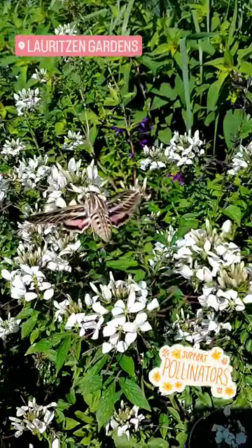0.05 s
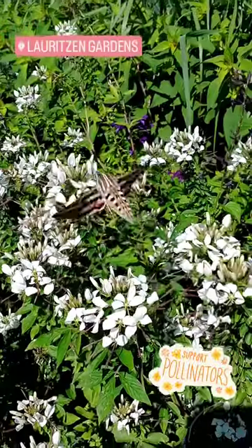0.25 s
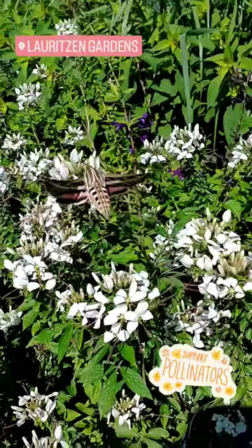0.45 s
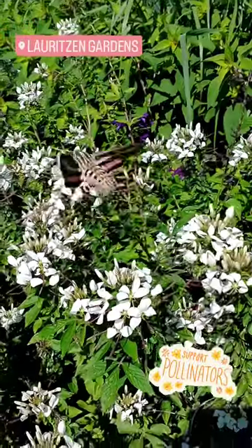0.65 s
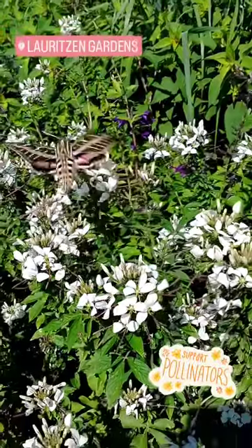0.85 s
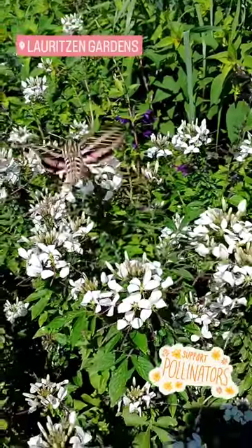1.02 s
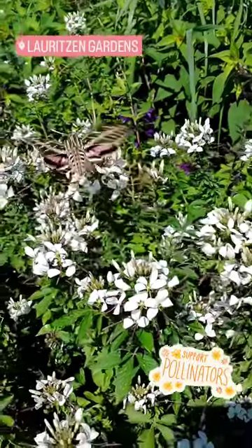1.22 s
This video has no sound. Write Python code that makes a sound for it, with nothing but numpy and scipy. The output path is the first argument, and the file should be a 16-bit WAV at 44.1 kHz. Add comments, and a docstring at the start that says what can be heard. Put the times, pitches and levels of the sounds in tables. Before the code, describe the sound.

Soft, gusty wind on the microphone, with faint insects trilling and chirping in a garden.

```python
"""After a moment of silence, a breeze rumbles and rushes at the microphone in a sunny flower garden.
It dies down together with the hum of a far machine. In the plants, over a distant insect chorus, one
insect rasps steadily, a second buzzes in two bouts, a third scrapes a fast, high trill with its wings
and two more give short chirps. Close by, something small squeaks once."""
import sys
import numpy as np
from scipy import signal
from scipy.fft import rfft, irfft
from scipy.io import wavfile

SR = 44100
rng = np.random.default_rng(int(sys.argv[2]) if len(sys.argv) > 2 else 0)


def dump_mix(stems):
    """Bounce the given channels to the path in sys.argv[1] as a 16-bit WAV at rate SR."""
    frames = np.atleast_2d(stems).T  # one column per channel
    limited = np.clip(frames, -1, 1)  # hard clip at full scale
    pcm = np.round(limited * 32767).astype(np.int16)
    wavfile.write(sys.argv[1], SR, pcm)


N = 112454


def undb(db):
    return 10 ** (np.asarray(db) / 20)


def clock():
    """Time of each sample in s."""
    return np.arange(N) / SR


def curve(rows, column=1):
    """One column of a table, joined by straight lines in time."""
    rows = np.array(rows, float)
    return np.interp(clock(), rows[:, 0], rows[:, column])


def shaped(gain):
    """Noise of rms 1 whose spectrum follows gain(Hz)."""
    hz = np.arange(N // 2 + 1) * SR / N + 1
    noise = irfft(rfft(rng.standard_normal(N)) * gain(hz), N)
    return noise / noise.std()


def coloured(points):
    """Noise with a spectrum of (f/Hz, level/dB) points, falling away below the lowest."""
    hz, db = np.array(points, float).T
    return shaped(lambda f: undb(np.interp(np.log(f), np.log(hz), db)) * np.minimum(f / hz[0], 1))


def ringing(hz, width_hz):
    """Noise in one resonance."""
    return shaped(lambda f: 1 / (1 + ((f - hz) / width_hz * 2) ** 2 / 2))


def wander(rate_hz):
    """Smooth random drift with a spread of 1."""
    return shaped(lambda f: 1 / (1 + (f / rate_hz) ** 4))


def turns(hz):
    """Cycles completed at a steady or moving rate."""
    return np.cumsum(hz * np.ones(N)) / SR


def throb(rate_hz, depth):
    """Slightly uneven wing strokes, as a gain of rms near 1."""
    strokes = turns(rate_hz * (1 + 0.0066 * wander(6)))
    return (1 + depth * np.cos(2 * np.pi * strokes)) / np.sqrt(1 + depth ** 2 / 2)


def blip(at, hz, glide_hz_per_s, sigma_s):
    """A short gliding tone under a bell-shaped envelope."""
    t = clock() - at
    cycles = hz * t + glide_hz_per_s * t * t / 2 + rng.random()
    return np.sqrt(2) * np.exp(-(t / sigma_s) ** 2 / 2) * np.sin(2 * np.pi * cycles)


def breeze():
    """Gusts at the microphone swell a low, fluttering rumble and a broader rush."""
    # gust strength: t/s, rumble level/dB, rush level/dB before its lift
    gusts = [(.3, -49.5, -59.5), (.42, -51.5, -56.5), (.6, -46, -56.5), (.68, -46.5, -56),
             (.84, -48, -55.5), (.98, -47.5, -56.5), (1.13, -50, -57.5), (1.19, -47.5, -59),
             (1.26, -50, -56), (1.3, -51, -58), (1.41, -42.5, -55.5), (1.45, -58, -60.5),
             (1.53, -49, -57.5), (1.75, -53, -61), (1.82, -47, -58), (1.89, -52, -59), (2.0, -54, -63.5),
             (2.11, -52, -63.5), (2.19, -57.5, -65), (2.55, -61.5, -69.5)]
    # spectra of the moving air: f/Hz, relative level/dB
    rumble_spectrum = [(15, -32.5), (25, -33), (42, -21), (58, -14.5), (76, -0.5), (115, 1.5), (165, 0),
                       (250, -7), (330, -12), (480, -27.5), (900, -52)]
    rush_spectrum = [(150, -5.5), (320, -4.5), (500, 0), (660, -2), (850, 0.5), (1100, -3), (1500, -5.5),
                     (2100, -10), (3100, -18), (5000, -27), (8000, -30)]
    rush_lift_db = 1.51
    rumble = coloured(rumble_spectrum) * undb(curve(gusts, column=1) + .5 * wander(23))
    rush = coloured(rush_spectrum) * undb(curve(gusts, column=2) + .41 * wander(15) + rush_lift_db)
    return rumble + rush


def machine_hum():
    """Wavering tones of a far machine, fading as the breeze drops."""
    # machine tones: f/Hz, relative level/dB, pitch waver/fraction, group (1 low, 2 upper)
    partials = [(84.45, -0.5, 0.0078, 1), (204.2, 0, .002, 1), (368, 0.5, 0.00038, 2),
                (550.4, -16.5, .003, 2), (839, -17, .008, 2)]
    # fade of the hum: t/s, low group level/dB, upper group level/dB
    levels = [(.3, -53.5, -55.5), (.55, -54.5, -55.5), (.68, -49, -56.5), (.85, -49.5, -55.5),
              (.98, -55, -57), (1.12, -56, -62), (1.38, -54, -62), (1.53, -64.5, -71.5), (1.8, -65, -69),
              (2.02, -67.5, -64), (2.25, -74.5, -81), (2.55, -77, -75.5)]
    tones = 0
    for hz, db, waver, group in partials:
        gain = undb(db + curve(levels, column=group) + .5 * wander(1.4))
        cycles = turns(hz * (1 + waver * wander(5.46))) + rng.random()
        tones += gain * np.sin(2 * np.pi * cycles)
    return np.sqrt(2) * tones


def insect_rasp():
    """One insect's steady wing strokes pulse a narrow resonance."""
    # strength of the rasp: t/s, level/dB
    levels = [(.3, -78), (.9, -74.5), (1.3, -72), (1.9, -75), (2.3, -76), (2.55, -79)]
    return ringing(5046, width_hz=260) * throb(rate_hz=62.4, depth=.54) * undb(curve(levels))


def far_chorus():
    """Many insects, far from the microphone, merge into a hiss."""
    # colour of the hiss: f/Hz, relative level/dB
    spectrum = [(2500, -25.5), (3350, -14.5), (3750, -2.5), (4100, -4.5), (4500, 0.5), (5000, -0.5),
                (5550, -4), (6100, -1.5), (6800, -4), (7400, -8.5), (8200, -10.5)]
    # strength of the hiss: t/s, level/dB
    levels = [(.3, -65), (1.0, -65.5), (1.8, -64), (2.15, -69), (2.35, -73.5), (2.55, -71)]
    return coloured(spectrum) * undb(curve(levels) + .88 * wander(25))


def insect_buzz():
    """Two bouts of fast scraping; a narrow wing resonance pulses at half the stroke rate."""
    # bouts: start/s, end/s, attack/s, release/s, scrape level/dB, stroke rate/Hz, ring level/dB
    bouts = [(0.214, 0.588, .07, 0.066, -62, 84, -77), (1.3, 2.367, 0.33, 0.11, -66, 86, -71.5)]
    # colour of the scrape: f/Hz, relative level/dB
    spectrum = [(4800, -33.5), (5700, -6), (6200, 3), (6500, 1.5), (6800, -5), (7250, 5.5), (7700, -4),
                (8300, -5)]
    t, buzz = clock(), 0
    for start, end, attack, release, scrape_db, rate_hz, ring_db in bouts:
        gate = np.clip((t - start) / attack, 0, 1) * np.clip((end - t) / release, 0, 1)
        scrape = undb(scrape_db) * coloured(spectrum) * throb(rate_hz, depth=.3)
        ring = undb(ring_db) * ringing(6460, width_hz=250) * throb(rate_hz / 2, depth=.5)
        buzz += gate * (scrape + ring)
    return buzz


def insect_trill():
    """Wing strokes whose scraped tone rises, peaks and falls each time; no two are quite alike."""
    # pace of the wings: t/s, stroke rate/Hz
    rates = [(0, 27.35), (.9, 27.3), (1.4, 27.7), (2.1, 27.6), (2.55, 27.4)]
    # strength of the trill: t/s, level/dB
    levels = [(.3, -74.5), (.45, -75), (.65, -75), (1.3, -75.5), (1.75, -71), (2.15, -77), (2.4, -83),
              (2.55, -84)]
    crest_s, crest_hz = .286, 7590  # one pitch arch tops out here
    lag_cycles, width_cycles = .071, .24  # each stroke is loudest just after its crest
    count = turns(curve(rates))
    count -= np.interp(crest_s, clock(), count)
    from_crest = (count + .027 * wander(7.2) + .5) % 1 - .5
    hz = crest_hz - 4230 * from_crest ** 2 + 54.5 * wander(20) + 90 * wander(400)
    envelope = np.exp(-((from_crest - lag_cycles) / width_cycles) ** 2 / 2)
    roughness = 1 + .17 * wander(250)
    tone = envelope * roughness * np.sin(2 * np.pi * turns(hz))
    return tone / tone.std() * undb(curve(levels) + .9 * wander(8.1))


def chirps(rows, hz, fall_hz_per_s, sigma_s, grain=.6):
    """One caller's short, grainy, falling notes, each with its own pitch and glide."""
    notes = 0
    for at, db in rows:
        pitch = hz * (1 + .012 * rng.standard_normal())
        glide = -fall_hz_per_s * rng.uniform(.39, 1.2)
        notes += undb(db) * blip(at, pitch, glide, sigma_s)
    return notes * (1 + grain * wander(300)) / np.hypot(1, grain)


def chirping_insects():
    """Two callers in the plants chirp in loose groups, one lower and fainter."""
    # each caller's notes, at their middles: t/s, level/dB
    high_notes = [(.468, -66), (.513, -68), (.56, -65), (.82, -69), (.868, -64.5), (.908, -62),
                  (1.21, -62.5), (1.25, -75), (1.296, -65.5), (1.706, -70), (1.752, -67), (2.091, -65)]
    low_notes = [(.376, -73), (.732, -71), (1.056, -72), (1.078, -73), (1.72, -75), (1.772, -73),
                 (2.07, -79), (2.17, -77)]
    high = chirps(high_notes, hz=4714, fall_hz_per_s=22000, sigma_s=.006)
    low = chirps(low_notes, hz=3710, fall_hz_per_s=11000, sigma_s=.015)
    return high + low


def squeak():
    """Something small near the microphone: two tiny rising notes, run together."""
    # the notes, at their middles: t/s, f/Hz, level/dB
    notes = [(.528, 1950, -52.5), (0.5352, 2790, -55)]
    return sum(undb(db) * blip(at, hz, glide_hz_per_s=30000, sigma_s=.0017) for at, hz, db in notes)


def scene():
    """The garden from one spot, in mono."""
    garden = chirping_insects() + breeze() + machine_hum() + insect_trill() + insect_buzz()
    return (garden + insect_rasp() + far_chorus() + squeak())[None, :]


def record(dry):
    """The microphone cuts in after silence, swells to full level and passes no top octave."""
    start_s, swell_s, swell_from_db, top_hz = .2264, .05, -6, 7900
    since = clock() - start_s
    gate = np.clip(since / .009, 0, 1)
    swell = undb(swell_from_db * np.clip(1 - since / swell_s, 0, 1))
    lowpass = signal.cheby1(12, .3, top_hz, fs=SR, output="sos")
    return signal.sosfilt(lowpass, dry * gate * swell)


dry = scene()
out = record(dry)
dump_mix(out)
```